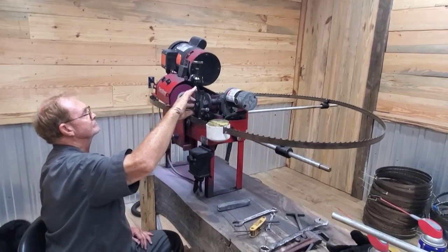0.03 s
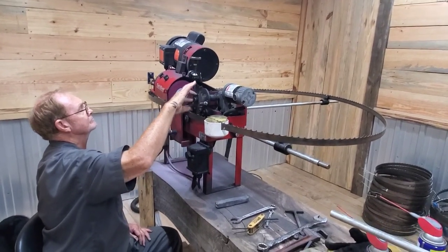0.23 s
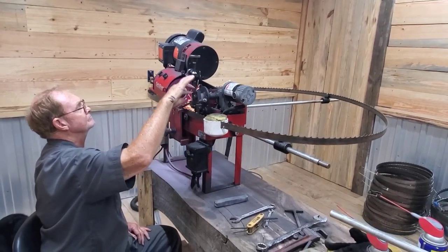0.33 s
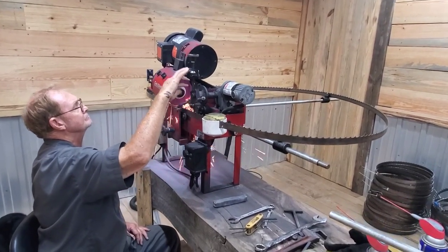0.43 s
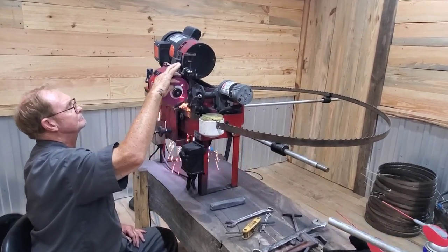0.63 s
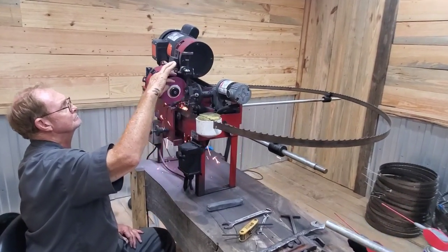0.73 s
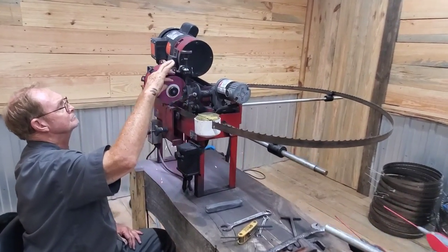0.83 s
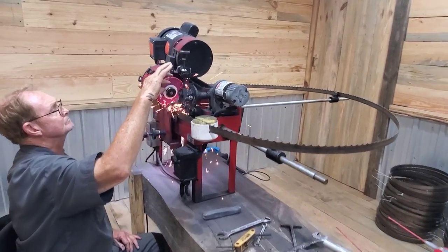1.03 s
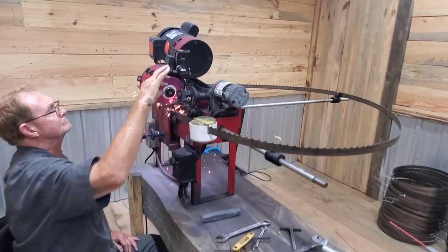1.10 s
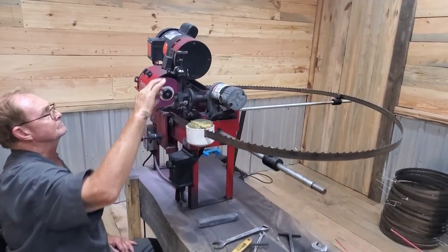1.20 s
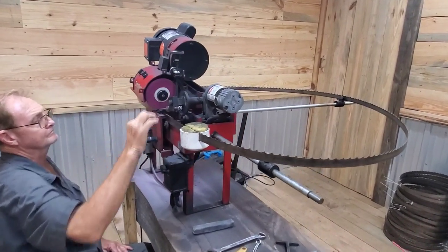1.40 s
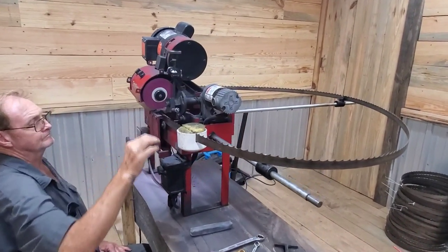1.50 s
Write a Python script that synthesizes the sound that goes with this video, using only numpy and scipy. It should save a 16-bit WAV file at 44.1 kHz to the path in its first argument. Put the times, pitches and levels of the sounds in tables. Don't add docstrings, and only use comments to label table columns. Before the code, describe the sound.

A grinding wheel bites a steel saw band twice, first a loud gritty hiss with sharp chips and ringing, then a shorter, softer, more ringing scrape, over humming motors in a wooden workshop, close stereo microphone.

```python
import sys
import numpy as np
from scipy import signal
from scipy.fft import rfft, irfft
from scipy.io import wavfile
from scipy.ndimage import uniform_filter1d

SR = 44100
rng = np.random.default_rng(int(sys.argv[2]) if len(sys.argv) > 2 else 0)


def transcribe(signal):
    frames = np.atleast_2d(signal).T
    limited = np.clip(frames, -1, 1)
    pcm = np.round(limited * 32767).astype(np.int16)
    wavfile.write(sys.argv[1], SR, pcm)


def nominal_scale(level):
    x = np.asarray(level, float) / 20
    return 10 ** x


N = 68355
T = np.arange(N) / SR

# (time [s], level [dB])
MOTOR_LEVEL = [(0, 9), (.03, 8.5), (.17, 8), (0.238, 11.5), (.32, 14), (.37, 7), (.43, 3.5), (.6, 3),
               (.85, 3.5), (1.0, 5), (1.12, 2), (1.238, 4.5), (1.4, 4), (1.55, 4.5)]
# (frequency [Hz], density [dB per Hz])
WHIRR_SPECTRUM = [(18, -34), (30, -1), (124, -3), (266, -13), (437, -9.5), (616, -13.5), (1960, -11.5),
                  (2410, -13), (16000, -39.5)]
# (frequency [Hz], likeness [0-1])
PORT_LIKENESS = [(30, 1), (400, 0.95), (650, 0.44), (1200, 0.42), (4000, 0.057), (16000, 0.4)]
# (frequency [Hz], lead [rad])
LEFT_LEAD = [(30, 0), (500, -0.29), (800, -0.05), (1640, 3), (2400, 8), (16000, 35.5)]
# (frequency [Hz], left minus right [dB])
SIDE_TILT = [(30, 0.1), (1500, -0.5), (5000, 5), (16000, 9)]
# (frequency [Hz], level [dB rms], width [Hz], steadiness [0-1])
HUM = [(59.7, -49.5, 0.81, 0.97), (76.3, -48.5, 0.5, 0.9), (121, -47, 2.4, 0.95), (144.3, -57.5, 10, 0),
       (197, -53, 20, 0.04), (315.5, -61, 12.3, 0.94), (450.8, -51, 6.27, 0.95), (1031, -55.5, 6, 0.95),
       (1116, -55, 5.2, 1), (2418, -51, 11.7, 0.99), (2370, -52.5, 11.3, 0.47), (2130, -90, 3.6, 0.6)]
# (frequency [Hz], level [dB rms], strongest at [s], spread [s])
WHINE = [(479, -42.5, .2, .17), (1249, -47, .2, .25), (1341, -50, .17, .17), (1879, -53, .2, .2),
         (1435, -54, .55, .2), (740, -51, .87, .04), (730, -48, 1.22, .055), (680, -52, 1.43, .1),
         (980, -55, .65, .1)]
# (frequency [Hz], T60 [s])
ROOM_T60 = [(1000, 1), (4000, 0.32), (8000, 0.44), (16000, 0.24)]
# (strongest tick [s], spread [s], level [dB])
GRAZE = [
    (0.032, 0.025, -53.5),
    (.203, 0.013, -57),
    (1.306, 0.021, -55.5),
    (1.465, 0.037, -56.5),
]
# (time [s], level [dB], share that comes once per turn [0-1])
FIRST_BITE = [
    (.327, -23, 0.6),
    (.345, -21.5, 0.3),
    (.375, -20, 0.33),
    (.45, -20, 0.14),
    (.51, -21.5, 0.75),
    (.55, -25, 0.41),
    (.65, -23.5, 0.47),
    (.73, -23, 0.28),
    (.75, -27.5, 0.34),
]
SECOND_BITE = [
    (.909, -28.5, .3),
    (.93, -23, 0.56),
    (.965, -26, .3),
    (1.0, -25, 0.17),
    (1.04, -23.5, 0.97),
    (1.05, -29, .3),
    (1.1, -30.5, 0.22),
    (1.13, -35.5, 0.3),
    (1.17, -65, .3),
]
# (frequency [Hz], density [dB per Hz])
FIRST_GRIT = [(880, -16), (1500, -23.5), (2560, -19), (3300, -9.5), (4970, -11), (6000, -6.5), (7540, -9.5),
              (11000, -7.5), (16000, 2)]
SECOND_GRIT = [(880, -2), (1500, -25.5), (2560, -8.5), (3300, -8.5), (4500, -22), (6000, -8), (7300, -20),
               (8800, -9.5), (16000, 3.5)]
FIRST_PITCHES = [1130, 2412, 2856, 3166, 3160, 5727, 5761, 6175, 6208, 9716, 10310, 13500, 14385, 15110]
SECOND_PITCHES = [2410, 2854, 3157, 3148, 5765, 5793, 6220, 9712, 10310, 11900, 12400, 14080, 14450, 15115]
# (level [dB], T60 [s], strongest at [s], spread [s])
FIRST_RING = [(-17.5, 0.51, 0.48, 0.12), (-8.5, 0.71, 0.4, 0.11), (-10.5, 0.45, 0.514, 0.09),
              (-3.5, 0.27, 0.585, 0.1), (-11.5, 0.11, 0.376, 0.023), (-3.5, 0.16, 0.628, 0.037),
              (-10, 0.48, 0.312, 0.5), (-8.5, 0.14, 0.4, 0.1), (-15, 0.47, 0.214, 0.52),
              (-19, 0.46, 0.51, 0.53), (-14, 0.38, 0.35, 0.1), (-20, 0.025, 0.92, 0.15),
              (-4, 0.033, 0.31, 0.59), (-9, 0.026, 0.33, 0.37)]
SECOND_RING = [(-16, 0.82, 0.96, 0.052), (2, 0.75, 1.121, 0.08), (-1, 0.255, 0.93, 0.034),
               (2, 0.49, 1.077, 0.058), (-7, 0.07, 1.2, 0.28), (-7, 0.7, 0.986, 0.03),
               (-5.5, 0.41, 1.03, 0.09), (-19.5, 0.44, 0.91, 0.35), (-11, 0.41, 0.86, 0.13),
               (-3, 0.029, 0.98, 0.044), (-5, 0.034, 0.95, 0.079), (4, 0.115, 0.985, 0.024),
               (5.5, 0.01213, 1.045, 0.046), (-10, .07, 1.3, 0.092)]
# (frequency [Hz], left minus right [dB])
RING_PAN = [(1000, 6), (2400, -6.5), (3160, 5.5), (5800, 9.5), (6200, 23), (10000, 25), (15000, -7.5)]
# (frequency [Hz], level [dB])
FIRST_TURN_LINES = [(2710, -24), (2783, -23), (2929, -27), (3015, -27), (3467, -26), (3842, -20), (3997, -26),
                    (4221, -24), (4296, -27), (4745, -27), (5060, -26), (5196, -23), (5276, -25), (5501, -24)]
SECOND_TURN_LINES = [(2622, -26), (2990, -25), (3225, -24), (3375, -23), (3747, -28), (4490, -31), (5033, -31),
                     (5238, -27), (5480, -29)]
# (time [s], level [dB], length [s])
KNOCKS = [(.3282, -13, .001), (.3413, -9, .0004), (.3546, -10, .001), (.3670, -14, .0005),
          (.3690, -9, .001), (.3722, -14, .0005), (.3808, -14, .0015), (.3958, -13, .0008),
          (.4585, -12, .001), (.5135, -14, .0008), (.5395, -14, .0008), (.9108, -21, .0015),
          (.9240, -20, .001), (.9287, -18, .001), (.9512, -18, .001)]
# (frequency [Hz], gain [dB])
MIC_RESPONSE = [(5500, 0), (6700, -2), (7600, -7), (8500, -2), (11500, -1), (14200, 2), (16000, -2)]

WHEEL_HZ, SLOWED_WHEEL_HZ = 75.38, 75.0
BUMP_HZ, FIRST_BUMP_S = 74.0, .3285
TOP_HZ = 15800


def evened(x):
    return x / np.sqrt(np.mean(x ** 2) + 1e-20)


def read(points, hz):
    f, value = np.transpose(points)
    return np.interp(np.log(hz + 1), np.log(f + 1), value)


def swell(at, spread):
    return np.exp(-.5 * ((T - at) / spread) ** 2)


def resonate(x, hz, width):
    turn = np.exp(2j * np.pi * hz * T)
    r = np.exp(-np.pi * width / SR)
    return 2 * (turn * signal.lfilter([1 - r], [1, -r], x / turn)).real


def wavering(hz, width, steady):
    phase = np.cumsum(rng.standard_normal(N)) * np.sqrt(2 * np.pi * width / SR)
    tone = np.sqrt(2) * np.cos(2 * np.pi * (hz * T + rng.random()) + phase)
    noise = evened(resonate(rng.standard_normal(N), hz, 2 * width))
    return steady * tone + np.sqrt(1 - steady ** 2) * noise


def whirr():
    frames, hz = N // 256 + 5, np.fft.rfftfreq(1024, 1 / SR)
    real, imag, patches = rng.standard_normal((frames, 513, 3)).T
    patches = uniform_filter1d(patches, size=10, axis=0)
    patches = evened(uniform_filter1d(patches, size=10, axis=1))
    flicker = evened(uniform_filter1d(rng.standard_normal(frames), size=8))
    flicker = flicker * np.minimum(hz / 9000, 1)[:, None]
    level_db = read(WHIRR_SPECTRUM, hz)[:, None] + 2.0 * patches + 0.18 * flicker
    noise = signal.istft((real + 1j * imag) * nominal_scale(level_db), nperseg=1024, noverlap=768)[1][:N]
    return nominal_scale(-42.5) * evened(noise)


def hum():
    return sum(nominal_scale(db) * wavering(hz, 0.4 * width, steady) for hz, db, width, steady in HUM)


def whine():
    return sum(nominal_scale(db) * swell(at, spread) * wavering(hz, 1.78, 0.81) for hz, db, at, spread in WHINE)


def ports(x, other):
    hz = np.fft.rfftfreq(N, 1 / SR)
    same = np.clip(read(PORT_LIKENESS, hz), 0, 1)
    tilt = nominal_scale(read(SIDE_TILT, hz) / 2)
    a, b = rfft(x), rfft(other)
    right = same * a * np.exp(-1j * read(LEFT_LEAD, hz)) + np.sqrt(1 - same ** 2) * b
    return irfft(np.array([a * tilt, right / tilt]), N)


def motors():
    split_hz, treble_follows = 13600, 0.21
    both = ports(whirr() + hum(), whirr() + hum())
    t, db = np.transpose(MOTOR_LEVEL)
    level_db = np.interp(T, t, db)
    low = signal.sosfiltfilt(signal.butter(2, split_hz, fs=SR, output="sos"), both)
    moving = low * nominal_scale(level_db) + (both - low) * nominal_scale(treble_follows * level_db)
    gear = whine()
    return moving + ports(gear, gear)


def room(x):
    taps = np.zeros((2, SR // 2))
    at = np.arange(120, SR // 2 - 20, 20)
    at = at + rng.integers(0, 20, (2, len(at)))
    np.put_along_axis(taps, at, rng.choice([-1., 1.], at.shape), 1)
    hz, t, z = signal.stft(taps, SR, nperseg=256)
    decay = nominal_scale(-60 * t / read(ROOM_T60, hz)[:, None])
    tail = signal.istft(z * decay, SR, nperseg=256)[1]
    return signal.fftconvolve(x[None], tail / np.linalg.norm(tail[0]), axes=1)[:, :N]


def graze():
    centre_hz, width_hz, sharpness = 10800, 8700, 2.1
    touch = np.zeros(N)
    for at, spread, db in GRAZE:
        once_per_turn = np.exp(sharpness * (np.cos(2 * np.pi * WHEEL_HZ * (T - at)) - 1))
        touch += nominal_scale(db) * once_per_turn * swell(at, spread)
    noise = resonate(rng.standard_normal(N), centre_hz, width_hz)
    noise = resonate(noise, centre_hz, width_hz)
    ticks = nominal_scale(8.0) * touch * evened(noise)
    return ticks * nominal_scale(np.array([[2.5], [-2.5]])) + nominal_scale(-15) * room(ticks)


def pressure(bite):
    t, db, share = np.transpose(bite)
    onset = np.clip((T - t[0]) / 0.00076, 0, 1)
    release = np.clip((t[-1] - T) / 0.002, 0, 1)
    force = nominal_scale(np.interp(T, t, db)) * onset * release
    bump = np.exp(3.5 * (np.cos(2 * np.pi * BUMP_HZ * (T - FIRST_BUMP_S)) - 1))
    share = np.clip(np.interp(T, t, share), 0, 1)
    return force * np.sqrt(1 - share + share * evened(bump) ** 2)


def grains(turn_hz):
    grains_per_s, spread_db, memory = 6800, 1.5, .86
    size = nominal_scale(spread_db * np.minimum(rng.exponential(1, N), 4))
    size = size * (rng.random(N) < grains_per_s / SR)
    fresh = evened(size * rng.standard_normal(N))
    turn = round(SR / turn_hz)
    rim = np.resize(fresh[::-1], (N // turn + 1, turn))
    again = signal.lfilter([1], [1, -memory], rim, axis=0).ravel()[:N]
    return evened(again), fresh


def grit(force, turn_hz, spectrum):
    repeat_top_hz, patch_db = 8500, 1.8
    scrape = np.array(grains(turn_hz)) * force
    hz, t, (again, fresh) = signal.stft(scrape, SR, nperseg=1024, noverlap=768)
    share = 1 / (1 + (hz[:, None] / repeat_top_hz) ** 4)
    z = np.sqrt(share) * again + np.sqrt(1 - share) * fresh
    patches = uniform_filter1d(rng.standard_normal(z.shape), size=10, axis=1)
    patches = evened(uniform_filter1d(patches, size=14, axis=0))
    colour = evened(nominal_scale(read(spectrum, hz)) * (hz > 1200) * (hz < TOP_HZ))
    z = z * colour[:, None] * nominal_scale(patch_db * patches)
    hiss = signal.istft(z, SR, nperseg=1024, noverlap=768)[1][:N]
    return hiss * force / (force + 1e-4)


def hiss(first, second):
    both = grit(first, WHEEL_HZ, FIRST_GRIT) + grit(second, SLOWED_WHEEL_HZ, SECOND_GRIT)
    direct = np.array([both, np.roll(both, shift=3)]) * nominal_scale(-3.5)
    pan = nominal_scale(np.array([[2.5], [-2.5]]))
    return pan * (direct + room(nominal_scale(3) * both))


def band(force, pitches, modes):
    steady, blur, apart = .94, .7, .5
    beat_share, beat_depth = 0.00283, 0.29
    out = np.zeros((2, N))
    for hz, (db, t60, at, spread) in zip(pitches, modes):
        keep = nominal_scale(-120 / (t60 * SR))
        energy = signal.lfilter([1 - keep], [1, -keep], (force * swell(at, spread)) ** 2)
        a, b = (wavering(hz, blur * 2.56 / t60, steady) for port in range(2))
        quarter_cycle = round(SR / hz / 4)
        right = np.sqrt(1 - apart ** 2) * np.roll(a, quarter_cycle) + apart * b
        pan = nominal_scale(read(RING_PAN, hz) / 2)
        beat = 1 + beat_depth * np.cos(2 * np.pi * beat_share * hz * (T - at))
        out += nominal_scale(db) * np.sqrt(energy) * beat * np.array([a * pan, right / pan])
    return out


def turn_lines(force, modes):
    hz, half = np.fft.rfftfreq(N, 1 / SR), 4
    comb = sum(nominal_scale(db) * half / (half + 1j * (hz - f)) for f, db in modes)
    comb = comb * np.sqrt(SR / (2 * np.pi * half))
    a, b = force * rng.standard_normal((2, N))
    return irfft(rfft(np.array([a, 0.23 * a + 0.74 * b])) * comb, N)


def knocks():
    force = np.zeros(N)
    for at, db, length in KNOCKS:
        decay = np.exp(-np.maximum(T - at, 0) / length)
        force += nominal_scale(db) * (T > at) * decay * np.minimum(abs(T - at) / .0003, 1)
    chips = force * evened(resonate(rng.standard_normal(N), 14200, 3500))
    return nominal_scale(5) * np.array([chips, .8 * chips]) + nominal_scale(-6) * room(chips)


def scene():
    first, second = pressure(FIRST_BITE), pressure(SECOND_BITE)
    mix = motors() + graze() + hiss(first, second)
    mix += band(first, FIRST_PITCHES, FIRST_RING) + band(second, SECOND_PITCHES, SECOND_RING)
    mix += turn_lines(first, FIRST_TURN_LINES) + turn_lines(second, SECOND_TURN_LINES)
    return mix + knocks()


def top_cut(x):
    return signal.sosfilt(signal.butter(12, 16000, fs=SR, output="sos"), x)


def record(dry):
    ceiling, mic_low_hz = .85, 52
    limited = ceiling * np.tanh(dry / ceiling)
    bass_cut = signal.butter(4, mic_low_hz, "high", fs=SR, output="sos")
    heard = signal.sosfilt(bass_cut, limited)
    band_limit = signal.firwin(511, TOP_HZ, window=("kaiser", 9), fs=SR)
    heard = signal.oaconvolve(heard, band_limit[None], "same")
    response = nominal_scale(read(MIC_RESPONSE, np.fft.rfftfreq(N, 1 / SR)))
    mix = irfft(rfft(heard) * response, N)
    return top_cut(mix)


dry = scene()
out = record(dry)
transcribe(out)
```